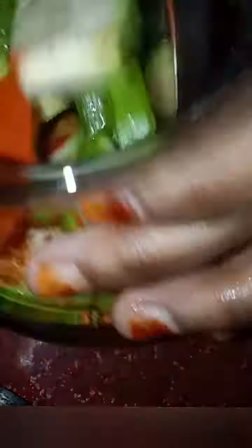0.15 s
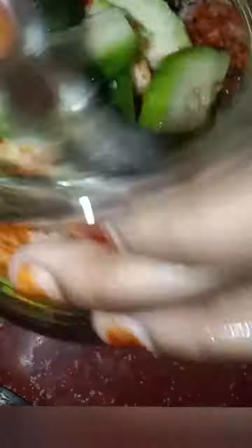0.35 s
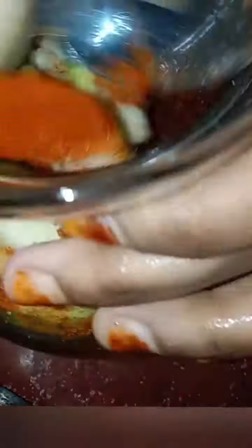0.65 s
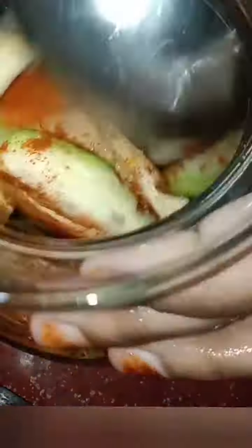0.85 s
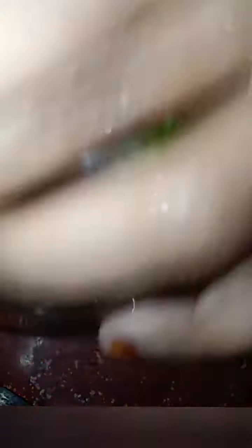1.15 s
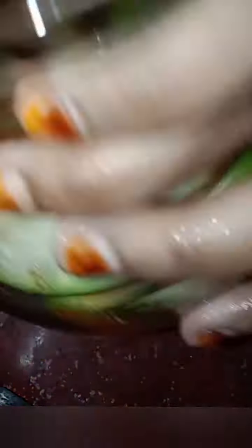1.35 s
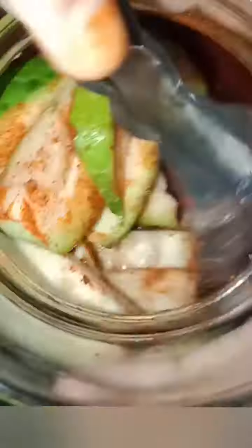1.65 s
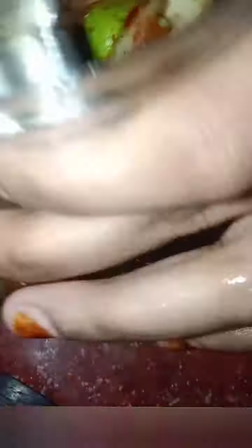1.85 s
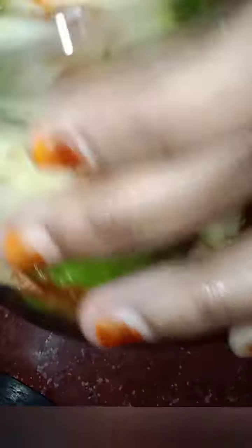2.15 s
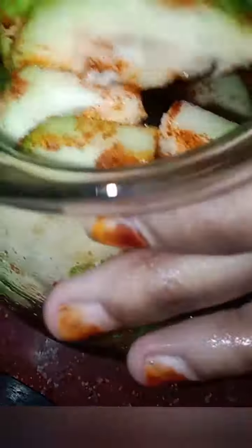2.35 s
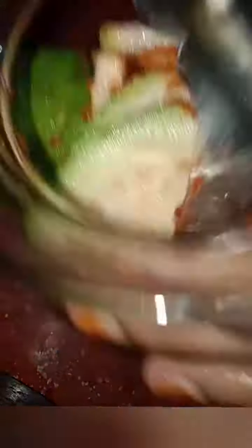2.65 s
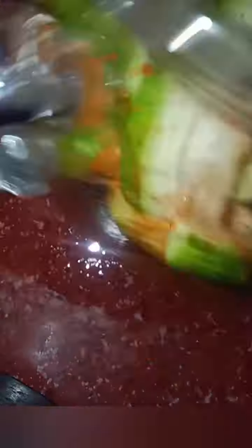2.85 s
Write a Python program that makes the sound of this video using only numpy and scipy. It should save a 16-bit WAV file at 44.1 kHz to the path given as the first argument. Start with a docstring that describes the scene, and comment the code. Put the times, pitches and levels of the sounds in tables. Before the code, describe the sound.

Spoon and fruit chunks clatter and scrape inside a hand-held glass jar in a small kitchen.

```python
"""A steel spoon tosses chunks of raw fruit in a hand-held glass jar, close to the microphone.
Knocks and scrapes drive the jar's damped modes and inner echoes; single glass notes are struck or bowed.
The spoon rings on hard blows, soft lumps swell the hollow air, and wet skins squeak as gliding tones.
Tumbling chunks are runs of dull noise bumps, and the jar meets the table as a filtered noise thump.
A small kitchen adds a short noise tail and an uneven low hum."""
import sys
import numpy as np
from scipy import signal
from scipy.io import wavfile
from scipy.ndimage import uniform_filter1d

SR = 44100
rng = np.random.default_rng(int(sys.argv[2]) if len(sys.argv) > 2 else 0)


def file_out(sig):
    """Save sig as 16-bit WAV at sys.argv[1]."""
    # one column per channel
    cols = np.atleast_2d(sig).T
    # limit, then scale
    lim = np.clip(cols, -1, 1)
    pcm = np.round(lim * 32767).astype(np.int16)
    wavfile.write(sys.argv[1], SR, pcm)


N = 132300  # samples: 3 s

BUILD_S = 0.00069  # time constant of the glass sound building up


def amp(db):
    """Decibels to gain."""
    return 10 ** (np.asarray(db) / 20)


def unit(x):
    """Scales to rms 1."""
    return x / np.sqrt(np.mean(x ** 2) + 1e-20)


def crest(x):
    """Scales so that the loudest 6 ms have rms 1."""
    power = uniform_filter1d(x ** 2, size=260)
    return x / np.sqrt(power.max() + 1e-20)


def add(mix, start_s, sound):
    """Mixes a sound in at a time; whatever falls before the start is cut off."""
    at = round(start_s * SR)
    sound = sound[max(-at, 0):]
    part = mix[max(at, 0):][:len(sound)]
    part += sound[:len(part)]


def filtered(x, kind, cutoff_hz, order):
    """Butterworth low-pass or high-pass filter."""
    sos = signal.butter(order, cutoff_hz, kind, fs=SR, output="sos")
    return signal.sosfilt(sos, x)


def coloured(x, points, size=4096):
    """Causal, minimum-phase filter through (frequency [Hz], level [dB]) points."""
    hz, db = np.transpose(points)
    bins_hz = abs(np.fft.fftfreq(size, 1 / SR))
    curve_db = np.interp(np.log(bins_hz + 1), np.log(hz), db)
    log_gain = np.log(amp(curve_db))
    spectrum = np.exp(np.conj(signal.hilbert(log_gain)))
    taps = np.fft.ifft(spectrum).real[:size // 2]
    return signal.fftconvolve(x, taps)[:len(x)]


def swell(length_s, rise, fall):
    """Attack, hold and release; rise and fall are shares of the length."""
    u = np.linspace(0, 1, max(round(length_s * SR), 64))
    ramp = np.clip(np.minimum(u / rise, (1 - u) / fall), 0, 1)
    return np.sin(np.pi / 2 * ramp) ** 2


def wander(count, size):
    """Smooth random drift: noise averaged twice over size samples."""
    noise = rng.standard_normal(SR // 2)
    smooth = uniform_filter1d(uniform_filter1d(noise, size), size)
    return unit(smooth)[:count]


def jar(force, colour, levels_db, ring_share=1):
    """A force rings the jar's modes and inner echoes; the place of contact sets each register's strength."""
    # the jar's air and glass, damped by the hand, before each contact's own variation:
    # (frequency [Hz], level [dB], t60 [s])
    modes = [(540, 8.5, 0.053), (628, -1, 0.049), (882, -5.5, 0.022), (991.7, -14.5, 0.13),
             (1144, -22.5, 0.073), (1376, -11, 0.056), (1850.7, -0.5, 0.078), (1942.5, -1, 0.049),
             (2238, 3, 0.047), (2968, -6, 0.055), (3168, -6.5, 0.033), (3485, -4, 0.038), (3920, -8, 0.051),
             (4134, -8, 0.071), (4483, -18, 0.033), (4830, -3, 0.04), (5176, 0.5, 0.023),
             (5790, -6.5, 0.059), (7046, -1.5, 0.032), (8240, -6, 0.038), (8630, -2.5, 0.025),
             (9270, -3.5, 0.056)]
    # boundaries between the registers, from hollow up to tick: (frequency [Hz])
    register_edges = [750, 1500, 2500, 5500]
    mode_spread_db, inside_t60_s, inside_db = 6.5, 0.047, -2
    first_share = 0.71  # strength of the first direct click, before the build-up

    t = np.arange(SR // 6) / SR
    ring = np.zeros(len(t))
    for hz, db, t60 in modes:
        level_db = db + mode_spread_db * rng.standard_normal()  # each contact favours other modes
        decay = amp(level_db - 60 * t / (t60 * ring_share))
        pitch = hz * (1 + .002 * rng.standard_normal())
        ring += rng.choice([-1, 1]) * decay * np.sin(2 * np.pi * pitch * t)
    inside = rng.standard_normal(len(t)) * amp(-60 * t / inside_t60_s)
    body = unit(ring) + amp(inside_db) * unit(inside)
    body *= 1 - (1 - first_share) * np.exp(-t / BUILD_S)

    rest = coloured(signal.fftconvolve(force, body), colour)
    rest = filtered(rest, "high", 310, order=2)  # the small jar radiates little bass
    registers = []
    for edge_hz in register_edges[:len(levels_db) - 1]:
        registers.append(filtered(rest, "low", edge_hz, order=11))
        rest = filtered(rest, "high", edge_hz, order=11)
    registers.append(rest)
    return sum(amp(db) * crest(part) for db, part in zip(levels_db, registers))


def scrape(length_s, *levels_db):
    """Sliding friction: tiny slips of uneven size, some at random and some in a regular judder."""
    # colour of sliding contact: (frequency [Hz], level [dB])
    scrape_colour = [(100, -1), (300, 1.5), (480, 11), (1000, 0), (2600, 0.5), (4000, 4), (6300, -7.5),
                     (9200, -7), (11000, -27), (15000, -55)]
    scrape_db, judder_db = -2.5, -0.5
    slips_per_s, slip_spread_db = 2200, 3.5
    pressed_ring, pressure_db = 0.92, 3.5  # sliding fruit damps the glass, and presses unevenly

    size = SR // 4
    slip_db = slip_spread_db * np.minimum(rng.exponential(1, size), 3)
    slips = (rng.random(size) < slips_per_s / SR) * rng.choice([-1, 1], size) * amp(slip_db)

    # slips fall into step at a rate that differs for each stroke
    judder_hz = rng.uniform(443.7, 1103) * (1 + 0.01775 * wander(size, size=250))
    turns = np.cumsum(judder_hz) / SR
    pulses = sum(np.cos(2 * np.pi * k * turns) for k in range(1, 16))
    judder = pulses * amp(3.9 * wander(size, size=120))

    stroke = swell(length_s, rise=0.23, fall=0.32)[:size]
    force = (unit(slips) + amp(judder_db) * unit(judder))[:len(stroke)] * stroke
    force *= amp(pressure_db * wander(len(force), size=220))
    return amp(scrape_db) * jar(force, scrape_colour, levels_db, pressed_ring)


def room_tail(x):
    """The kitchen's short, faint reflections: decaying noise convolved with the close sound."""
    t60_s, rise_s, tail_db = 0.17, 0.0083, -13.5
    t = np.arange(SR // 2) / SR
    tail = rng.standard_normal(len(t)) * amp(-60 * t / t60_s) * np.minimum(t / rise_s, 1)
    wet = signal.fftconvolve(x, tail / np.linalg.norm(tail))[:N]
    return amp(tail_db) * coloured(wet, [(500, 1.5), (3500, -2), (9000, -7.5)])


def hum():
    """Room tone and handling rumble: filtered noise that swells unevenly."""
    # spectrum of the noise: (frequency [Hz], level [dB])
    hum_colour = [(20, -10), (40, -11), (65, -4.5), (95, 4), (150, -7), (250, -14), (550, -10.5),
                  (1000, -16), (3500, -26), (6000, -40.5), (9500, -41.5), (12000, -73)]
    hum_db, sway_db = -39.5, 4.8
    noise = rng.standard_normal(N)
    sway = uniform_filter1d(uniform_filter1d(rng.standard_normal(N), size=2500), size=2500)
    return amp(hum_db) * unit(coloured(noise * amp(sway_db * unit(sway)), hum_colour))


def knock(chatter_s, *levels_db):
    """One sharp blow, then a dying chatter of sparse random clicks, steel on glass."""
    # colour of a hard contact: (frequency [Hz], level [dB])
    knock_colour = [(100, 3), (300, -29), (480, -15), (1000, -2.5), (2600, -3), (4000, 5.5), (6300, -1.5),
                    (9200, -0.5), (9700, -8.5), (11000, -18), (15000, -38.5)]
    knock_db, chatter_db, clicks_per_s = -5, -3.5, 5000
    t = np.arange(SR // 16) / SR
    clicks = rng.standard_normal(len(t)) * (rng.random(len(t)) < clicks_per_s / SR)
    force = amp(chatter_db) * clicks * np.exp(-t / max(chatter_s, 1e-4))
    force[0] = 1  # the blow itself
    return amp(knock_db) * jar(force, knock_colour, levels_db)


def squeak(length_s, db, hz, glide):
    """Wet skin and steel stick and slip: a brief, unsteady gliding tone with a faint octave."""
    grip = swell(length_s, rise=0.21, fall=0.21)
    count = len(grip)
    pitch = hz * (1 + glide * np.linspace(-.5, .5, count) + .007 * wander(count, size=70))
    phase = 2 * np.pi * np.cumsum(pitch) / SR
    tone = np.sin(phase) + amp(-37) * np.sin(2 * phase)
    return amp(db) * crest(grip * amp(3.6 * wander(count, size=130)) * tone)


def spoon(db):
    """The spoon's bowl rings briefly: a few decaying sines with a soft onset."""
    # the spoon's modes, levels relative to each other: (frequency [Hz], level [dB], t60 [s])
    spoon_modes = [(743.5, -12, 0.15), (898, -5.5, 0.07), (985, 3.5, 0.018)]
    t = np.arange(SR // 8) / SR
    ring = np.zeros(len(t))
    for hz, level, t60 in spoon_modes:
        ring += amp(level - 60 * t / t60) * np.sin(2 * np.pi * (hz * t + rng.random()))
    return amp(db) * crest(ring * (1 - np.exp(-t / 0.0013)))


def glass_ring(db, hz):
    """One struck mode of the wall builds up quickly and dies away."""
    t60_s = 0.079
    t = np.arange(SR // 6) / SR
    envelope = (1 - np.exp(-t / BUILD_S)) * amp(-60 * t / t60_s)
    return amp(db) * crest(envelope * np.sin(2 * np.pi * hz * t))


def thud(length_s, db, hz):
    """A soft push swells the air resonance, which wavers as fruit and spoon move."""
    push = swell(length_s, rise=0.37, fall=0.57)
    pitch = hz * (1 + .018 * wander(len(push), size=200))
    return amp(db) * crest(push * np.sin(2 * np.pi * np.cumsum(pitch) / SR))


def bowed(length_s, db, hz):
    """Friction keeps one mode of the wall singing, steady in pitch and uneven in level."""
    grip = swell(length_s, rise=0.067, fall=0.083)
    tone = np.sin(2 * np.pi * hz * np.arange(len(grip)) / SR)
    return amp(db) * crest(grip * amp(2.0 * wander(len(grip), size=160)) * tone)


def tumble(length_s, db):
    """Chunks judder down the wall: a run of irregular impulses, each with a dull noise echo."""
    # colour of the tumbling: (frequency [Hz], level [dB])
    tumble_colour = [(60, -15), (140, -5), (195, 5.5), (260, -6), (400, -12), (560, -2), (800, -19),
                     (1200, 2), (1500, -5.5), (1900, -1.5), (2400, -24), (9000, -64)]
    bumps_per_s, echo_t60_s = 160, 0.055  # the rate wanders about this
    roll = swell(length_s, rise=0.31, fall=0.26)
    rate = bumps_per_s * np.exp(.3 * wander(len(roll), size=150))
    count = np.floor(np.cumsum(rate) / SR)
    bumps = np.diff(count, prepend=0) * roll * amp(1.9 * rng.standard_normal(len(roll)))
    t = np.arange(SR // 16) / SR
    echo = rng.standard_normal(len(t)) * amp(-60 * t / echo_t60_s)
    return amp(db) * crest(coloured(signal.fftconvolve(bumps, echo), tumble_colour))


def bump(db):
    """The jar's base meets the table: a short noise burst filtered to a dull thump."""
    # colour of the thump: (frequency [Hz], level [dB])
    bump_colour = [(30, -17), (85, -1), (140, -11), (255, -9), (320, -0.5), (400, -9.5), (520, -12.5),
                   (900, -14), (3000, -90)]
    rise_s = 0.004  # the envelope peaks here
    u = np.arange(SR // 5) / SR / rise_s
    burst = rng.standard_normal(len(u)) * u * np.exp(-u)
    return amp(db) * crest(coloured(burst, bump_colour))


def scene():
    """Everything in the jar, with the room around it."""
    # Knock and scrape levels are register balances, before the overall level of their kind.
    # spoon and fruit sliding on the glass:
    # (start [s], length [s], hollow [dB], clunk [dB], ring [dB], tick [dB])
    scrape_events = [(-.02, 0.081, -40, -30, -33, -31), (0.167, 0.074, -23, -27, -33, -22.5),
                     (0.29, 0.033, -56, -55, -26, -25.5), (0.337, 0.068, -28.5, -42, -27.5, -27),
                     (0.375, 0.14, -32, -34, -29, -26), (0.445, 0.036, -23.5, -34, -16.5, -23.5),
                     (0.504, 0.034, -47, -33.5, -32, -47), (0.541, 0.072, -34, -22, -15.5, -23),
                     (.582, 0.024, -25, -26.5, -16.5, -19.5), (0.597, 0.023, -15, -22, -18.5, -20.5),
                     (0.638, 0.037, -23.5, -37, -41, -22.5), (0.686, 0.036, -23.5, -24.5, -30, -29.5),
                     (0.72, 0.038, -29, -30.5, -29, -38), (0.809, 0.014, -35, -31, -19.5, -26.5),
                     (0.846, 0.061, -40, -32, -18, -26), (0.951, 0.062, -15, -32, -31.5, -35),
                     (1.072, 0.057, -20, -29, -31, -45), (1.115, 0.037, -40, -38, -36, -38),
                     (1.15, 0.037, -30.5, -44, -16.5, -26), (1.178, 0.051, -23, -31, -27, -25.5),
                     (1.259, 0.12, -41, -31.5, -29.5, -37), (1.427, 0.033, -30.5, -18, -16.5, -23.5),
                     (1.499, 0.04, -17.5, -28.5, -25, -25), (1.518, 0.053, -46, -31, -24.5, -23.5),
                     (1.574, 0.052, -21, -26.5, -17.5, -22), (1.725, 0.044, -49, -28.5, -32, -42),
                     (1.779, 0.031, -55, -48, -34, -46), (1.823, 0.033, -21.5, -23.5, -29, -36.5),
                     (1.89, 0.043, -27, -55, -38, -31), (1.966, 0.03, -29, -24.5, -30.5, -28.5),
                     (1.993, 0.09, -36.5, -50, -53, -34), (2.077, 0.036, -33, -42, -24.5, -31.5),
                     (2.126, 0.034, -40, -34, -21.5, -26), (2.141, 0.058, -37, -34.5, -16, -22),
                     (2.192, 0.035, -50, -41, -32, -39), (2.328, 0.042, -65, -67, -38.5, -42.5),
                     (2.385, 0.03, -25.5, -40.5, -38, -31.5), (2.418, 0.041, -36, -47, -38, -34),
                     (2.564, 0.039, -18.5, -31, -43, -22.5), (2.597, 0.028, -20, -27, -28, -21),
                     (2.642, 0.036, -26, -37.5, -23, -25), (2.698, 0.059, -21.5, -31, -19, -19.5),
                     (2.732, 0.042, -19, -27.5, -20, -24.5), (2.762, 0.057, -23, -24, -18, -36),
                     (2.925, 0.048, -22.5, -31.5, -49, -36)]
    # hard contacts:
    # (time [s], hollow [dB], clunk [dB], ring [dB], clink [dB], tick [dB], chatter decay [s])
    knock_events = [(0.036, -24.5, -25, -12, -21, -22, 0.0035),
                    (0.0965, -18, -22, -10.5, -13.5, -15.5, 0.0011),
                    (0.118, -17, -17.5, -17, -13, -18.5, 0.0089),
                    (0.135, -15.5, -29, -16, -15, -22.5, 0.0092),
                    (0.2325, -19, -29, -19, -16.5, -20.5, 0.0076),
                    (0.273, -18, -32, -12, -15.5, -16.5, 0.013), (.461, -38, -23, -13, -27, -50, 0.013),
                    (0.787, -13, -20.5, -16.5, -13.5, -17, 0.0089),
                    (0.902, -17, -26, -34, -13, -22, 0.0081), (0.908, -7.5, -30, -12, -16, -15, 0.0042),
                    (0.949, -18, -24.5, -14.5, -22, -21.5, 0.0066),
                    (0.993, -9, -22, -14.5, -22, -33, 0.0015), (1.001, -9, -18.5, -12, -16, -25, 0.0024),
                    (1.016, -12, -24, -20, -41, -46, 0.0018),
                    (1.046, -21, -19, -14.5, -20.5, -31.5, 0.0016),
                    (1.062, -9, -18.5, -18, -41, -61, 0.0024), (1.328, -56, -49, -47, -30, -31.5, 0.0021),
                    (1.3747, -13.5, -16, -15, -16, -20.5, 0.0027),
                    (1.5693, -16, -15.5, -12.5, -16.5, -18.5, 0.003),
                    (1.645, -9.5, -44, -12.5, -31.5, -26.5, 0.0053),
                    (1.658, -32, -39, -22, -33, -33.5, 0.0026),
                    (1.8578, -4.5, -11.5, -12.5, -44, -59, 0.0056),
                    (2.02, -43, -54, -35, -25, -30.5, .0033), (2.111, -33, -26, -24, -22, -23, 0.0011),
                    (2.378, -54, -46, -43, -22.5, -30, 0.0059),
                    (2.536, -14.5, -20, -17.5, -36, -36, 0.0017),
                    (2.544, -10.5, -27, -9.5, -15, -22.5, 0.0036),
                    (2.5979, -33, -31, -20.5, -23, -20, 0.0013),
                    (2.6183, -45, -36, -14, -15.5, -20, 0.0034),
                    (2.6352, -25, -33, -13, -16.5, -11, 0.0018)]
    # wet skin on steel: (start [s], length [s], level [dB], pitch [Hz], glide [share of pitch])
    squeak_events = [(0.057, 0.039, -28.5, 3060, -0.071), (0.336, 0.049, -22, 3450, 0.074),
                     (0.386, 0.025, -27.5, 1583, -0.087), (0.461, 0.019, -14.5, 1453, -0.12),
                     (0.509, 0.022, -24.5, 1773, 0.018), (0.669, 0.0217, -26.5, 2990, -0.023),
                     (0.67, 0.027, -30, 2700, 0.013), (1.466, 0.095, -24, 1000, -0.12),
                     (2.179, 0.024, -16.5, 2470, 0.056), (2.708, 0.022, -21, 3170, -0.016)]
    # the spoon's own ring after the hardest blows: (time [s], level [dB])
    spoon_events = [(.098, -10.5), (.12, -17.5), (1.376, -14.5), (1.861, -29.5)]
    # blows that leave one note of the glass ringing: (time [s], level [dB], pitch [Hz])
    ring_events = [(.12, -12, 1960), (.233, -25.5, 5187), (0.279, -20, 6975), (1.377, -12.5, 1960),
                   (1.572, -19, 4800), (1.568, -28, 8470), (2.638, -19.5, 1796)]
    # soft lumps sounding the air in the jar: (start [s], length [s], level [dB], centre pitch [Hz])
    thud_events = [(0.189, 0.03, -24.5, 613), (0.233, 0.021, -17, 625), (0.69, 0.032, -16, 549),
                   (0.83, 0.012, -20, 590), (0.951, 0.029, -19, 539), (1.01, 0.092, -23, 549.7),
                   (1.594, 0.034, -12.5, 544), (1.714, 0.061, -21, 548), (2.153, 0.047, -24.5, 465),
                   (2.336, 0.038, -28, 469), (2.459, 0.018, -23.5, 583), (2.733, 0.023, -14.5, 536),
                   (2.99, 0.063, -12.5, 578)]
    # the sliding spoon bows one glass note: (start [s], length [s], level [dB], pitch [Hz])
    bowed_events = [(.293, 0.033, -25, 2162), (0.678, 0.085, -36, 2686), (.962, 0.017, -26, 2315),
                    (1.503, .122, -22, 1836), (1.56, 0.069, -20.5, 4080)]
    # chunks juddering down the wall: (start [s], length [s], level [dB])
    tumble_events = [(.997, 0.036, -19.5), (1.062, 0.049, -25), (2.744, 0.073, -28.5)]
    # the jar meets the table: (time [s], level [dB])
    bump_events = [(1.644, -14.5), (1.657, -39)]

    mix = np.zeros(N)
    for s, *row in scrape_events:
        add(mix, s, scrape(*row))
    for s, *levels, chatter_s in knock_events:
        add(mix, s, knock(chatter_s, *levels))
    for s, *row in squeak_events:
        add(mix, s, squeak(*row))
    for s, db in spoon_events:
        add(mix, s, spoon(db))
    for s, *row in ring_events:
        add(mix, s, glass_ring(*row))
    for s, *row in thud_events:
        add(mix, s, thud(*row))
    for s, *row in bowed_events:
        add(mix, s, bowed(*row))
    for s, *row in tumble_events:
        add(mix, s, tumble(*row))
    for s, db in bump_events:
        add(mix, s, bump(db))
    return (mix + room_tail(mix) + hum())[None]


def record(dry):
    """The microphone drops the deepest bass and rounds off peaks softly; then the band limit."""
    dry = filtered(dry, "high", 45, order=2)
    held = dry / (1 + (dry / .85) ** 8) ** (1 / 8)
    band_limit = signal.firwin(255, 15500, window=("kaiser", 9), fs=SR)  # cutoff in Hz
    return signal.oaconvolve(held, band_limit[None], "same")


dry = scene()
out = record(dry)
file_out(out)
```